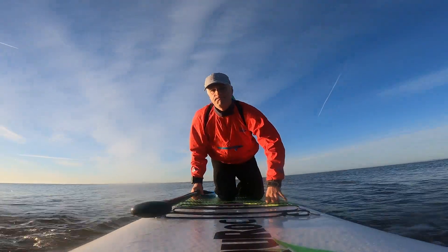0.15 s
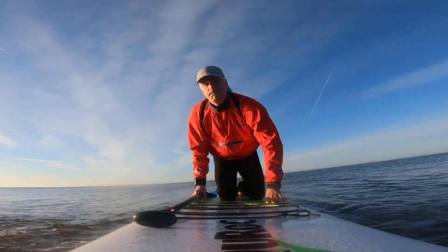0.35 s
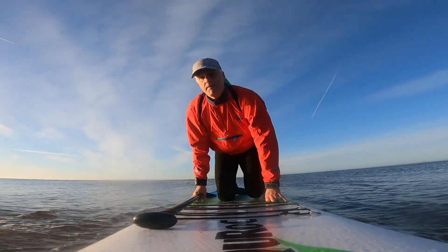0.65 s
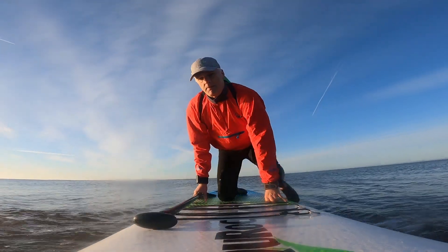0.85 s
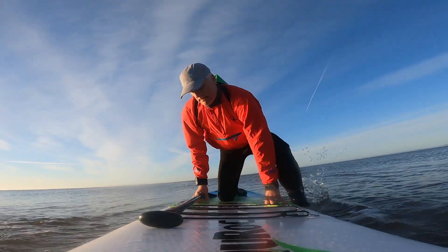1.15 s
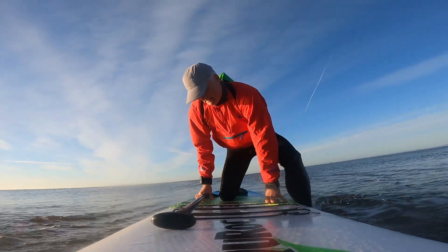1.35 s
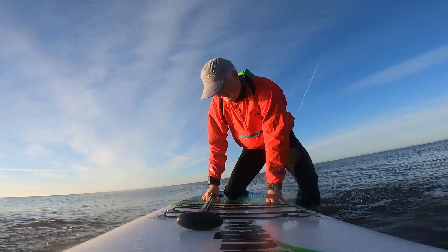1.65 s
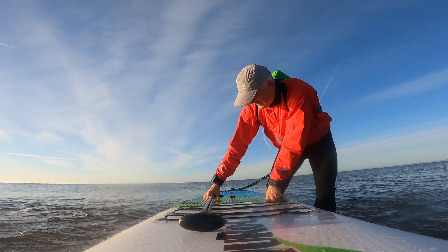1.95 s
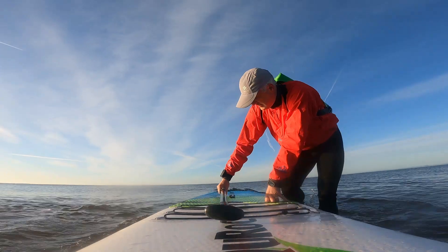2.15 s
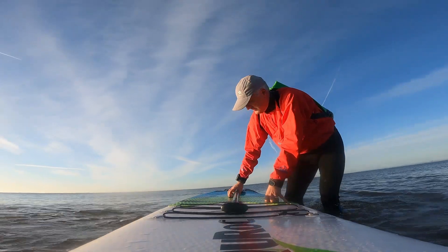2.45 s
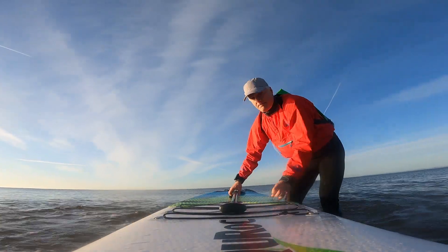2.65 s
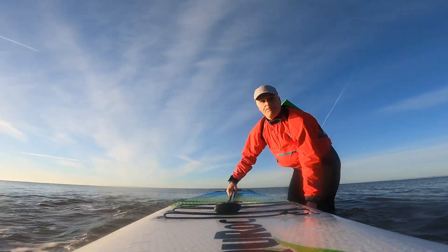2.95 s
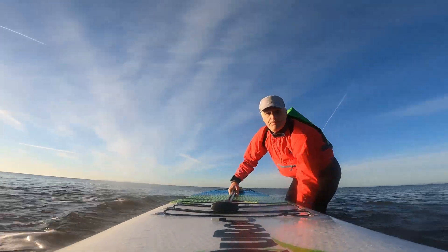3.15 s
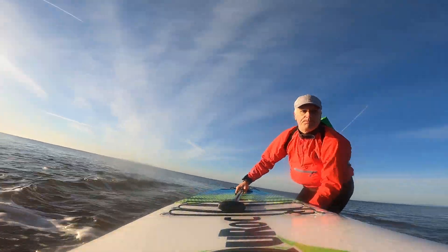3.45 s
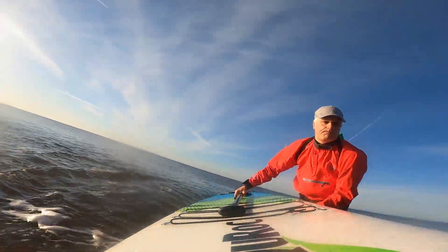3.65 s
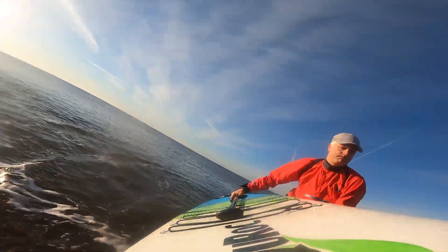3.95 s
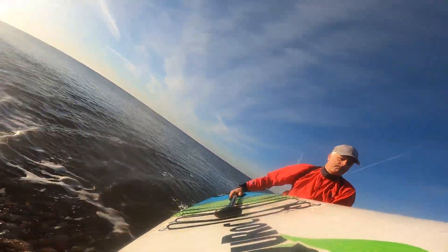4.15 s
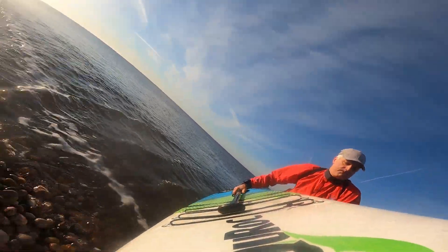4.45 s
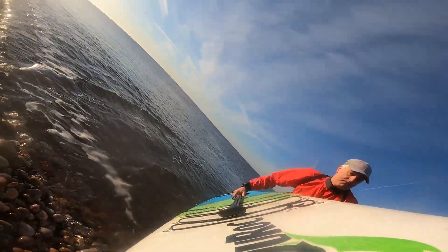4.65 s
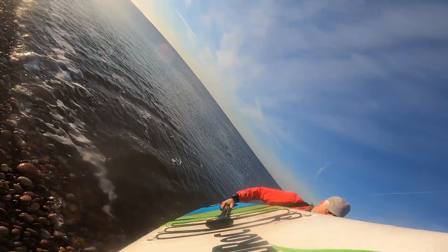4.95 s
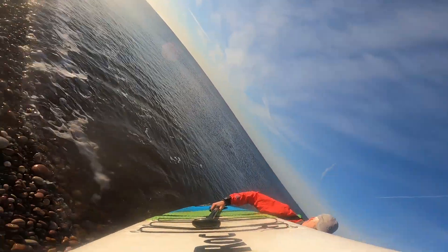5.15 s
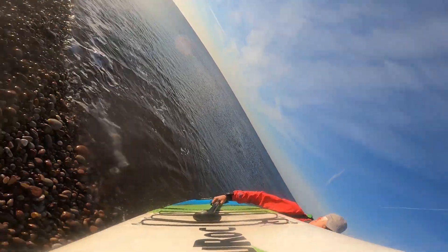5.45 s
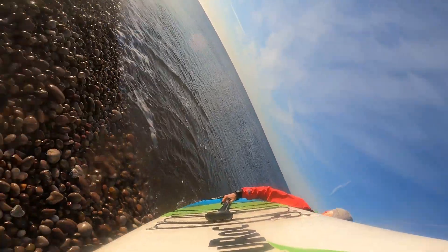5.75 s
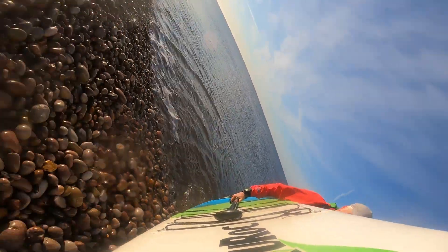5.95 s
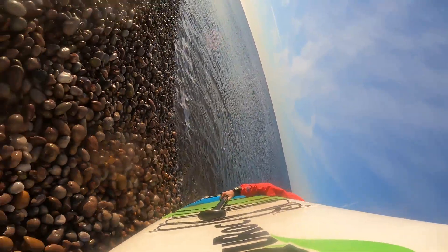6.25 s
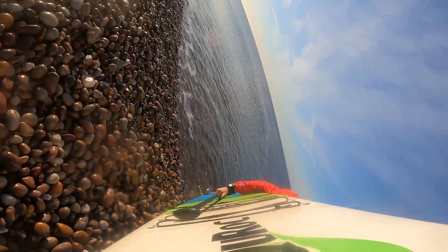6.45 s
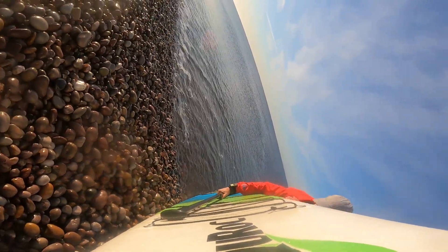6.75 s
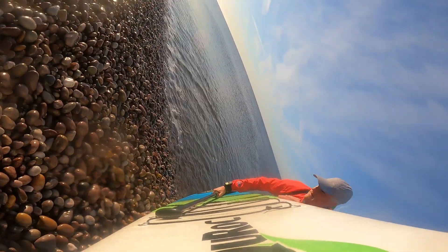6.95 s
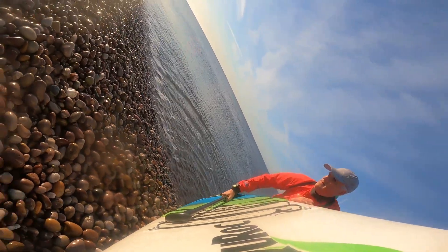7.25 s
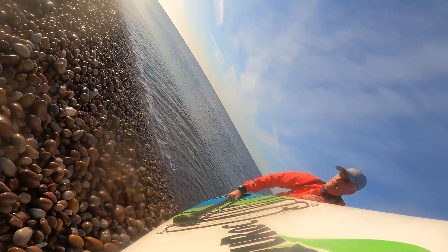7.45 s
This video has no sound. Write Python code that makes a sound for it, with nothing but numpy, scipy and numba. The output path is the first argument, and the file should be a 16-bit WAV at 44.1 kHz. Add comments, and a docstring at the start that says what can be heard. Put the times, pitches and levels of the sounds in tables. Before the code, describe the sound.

Choppy shallow water sloshes against an inflatable paddleboard, sounding close and muffled through the hull and a sealed microphone case. At the start the wash is strong over a low drumming, with a faint, very high hiss of spray, and two dull knocks and a sharp tick land at about 0.5 seconds. From 1 second the water eases and bubbles plop. From 2 seconds the hull rumbles harder in uneven heaves, with more plops and small ticks of drops and stones on the mount. Dull knocks come near 2.7, 3.3 and 3.6 seconds, and the thin hiss stops at about 3.8. Another knock and a surge of sloshing follow at 4.2. The splashing, gurgling and ticking are busiest around 6 seconds, with knocks near 6.3 and 6.8. A faint bright hiss swells at the very end, around 7.5 seconds.

```python
"""A paddleboard in pebble shallows, heard muffled through its inflated hull and a sealed camera case.
At first chop sloshes against the drumming hull, spray hisses thinly and the board takes two knocks.
From about 1 s bubbles plop; from 2 s the hull rumbles harder and drops and stones tick on the mount.
The board is knocked as it is tipped up, and near 3.8 s, as it is lifted, the thin hiss stops.
Chop and knocks go on, busiest around 6 s, and a bright hiss swells at the very end."""
import sys
import numpy as np
from scipy import signal
from scipy.io import wavfile
from scipy.ndimage import uniform_filter1d
from numba import njit

SR = 44100
rng = np.random.default_rng(int(sys.argv[2]) if len(sys.argv) > 2 else 0)


def transcribe(u):
    """Save the signal u as a 16-bit wav file named by the first command-line argument.

    u: samples, shape (n,) or (channels, n), limited to [-1, 1]; the rate is SR.
    q: integer samples, one column per channel.
    """
    v = np.clip(np.atleast_2d(u).T, -1, 1)
    q = np.round(v * 32767).astype(np.int16)
    wavfile.write(sys.argv[1], SR, q)


N = 335601

# steady churn of the water: time_s, rumble_db, slosh_db, wash_db, splash_db, fizz_db
CHURN = [(0, -36, -22.5, -20, -40, -60.5), (.22, -33, -26.5, -18, -58, -69),
         (.42, -33.5, -32.5, -20, -50.5, -80), (.8, -33, -42.5, -31.5, -58.5, -88),
         (1.17, -34, -49.5, -34.5, -68.5, -79), (1.35, -43.5, -47, -33.5, -77, -80.5),
         (1.59, -42.5, -38.5, -31.5, -58.5, -74), (1.9, -42, -47.5, -38.5, -62, -78),
         (2.02, -44, -34.5, -36, -52.5, -76), (2.2, -28, -33, -27.5, -52.5, -75),
         (2.6, -29, -35, -29, -63.5, -76), (2.94, -26.5, -46.5, -37, -58, -79),
         (3.3, -29, -30.5, -36, -53, -75.5), (3.9, -29, -43, -38, -55.5, -72),
         (4.11, -28.5, -32, -33, -47.5, -70.5), (4.62, -28.5, -32, -30, -50, -71),
         (5.07, -29, -32, -26.5, -47.5, -67), (5.64, -24, -31, -33.5, -50, -70),
         (6.04, -30.5, -25, -22.5, -46, -76.5), (6.4, -27.5, -29.5, -36.5, -52, -72),
         (6.87, -27.5, -29, -32.5, -52.5, -69.5), (7.12, -30, -29.5, -30.5, -46, -72.5),
         (7.61, -36, -37.5, -31.5, -47, -64.5)]
# the hull heaving as water sloshes under it: start_s, hold_s, rumble_db, slosh_db
HULL_HEAVES = [(.45, 0.016, -17.5, -24), (.57, .02, -26.5, -43.5), (2.07, .015, -24.5, -30.5),
               (2.17, 0.07, -31, -25), (2.36, .09, -33, -25.5), (2.5, 0.022, -21.5, -31.5),
               (2.65, 0.068, -22, -23.5), (2.78, 0.009, -17, -30), (2.98, 0.082, -24, -42),
               (3.3, 0.12, -36.5, -26), (3.56, 0.041, -35, -22), (4.17, 0.073, -25, -21),
               (4.27, .04, -27, -20.5), (4.33, 0.086, -23.5, -25.5), (4.535, 0.005, -30, -20.5),
               (5.17, 0.0083, -29, -26.5), (5.27, 0.15, -23.5, -26.5), (5.715, 0.013, -28.5, -20),
               (5.79, 0.048, -29, -18), (5.89, .01, -23.5, -24), (5.94, 0.019, -31, -19),
               (6.17, 0.063, -25.5, -21.5), (6.25, 0.025, -23.5, -21), (6.36, .04, -21, -34),
               (6.52, 0.098, -18.5, -22), (6.8, .01, -21, -34), (7.18, 0.19, -24.5, -39.5)]
# chop breaking against the board: start_s, hold_s, wash_db, splash_db, fizz_db
CHOP_BREAKS = [(.43, 0.014, -18.5, -53, -65), (.57, 0.16, -48, -56.5, -85), (2.045, 0.015, -25, -64, -75.5),
               (2.17, 0.042, -24.5, -52, -79), (2.365, 0.024, -21, -59, -73),
               (2.46, 0.04, -23.5, -59, -71.5), (2.63, 0.034, -25, -61, -71),
               (2.78, .01, -24.5, -53.5, -78), (3.472, 0.019, -33.5, -40, -81),
               (3.555, 0.05, -31, -40.5, -78), (4.128, .005, -19.5, -44, -72),
               (4.19, .005, -20, -39.5, -71), (4.25, 0.15, -25.5, -49.5, -73.5),
               (4.53, 0.015, -29, -45.5, -70), (5.692, 0.0078, -26.5, -38.5, -72.5),
               (5.787, .005, -27, -39.5, -71.5), (5.885, 0.031, -20, -37, -67), (6.0, .19, -21, -54.5, -73),
               (6.234, 0.018, -17.5, -34, -57), (6.37, 0.0088, -38, -49, -64),
               (6.494, 0.05, -18.5, -34, -59.5), (6.57, 0.16, -22, -38, -66.5),
               (7.19, 0.056, -31, -43.5, -74)]
# deep notes of the hull: pitch_hz, width_hz, level_db
HULL_NOTES = [(26.7, 13, -2), (51.5, 11, 0), (68.2, 13, 0.5)]
# notes of the sloshing water: pitch_hz, width_hz, level_db
SLOSH_NOTES = [(110, 63, 1), (157.4, 60, 0.5), (214.7, 33, -7)]
# how much the large bubbles stand out in the wash: time_s, boost_db
LARGE_BUBBLE_BOOST = [(0, 3.5), (.5, -0.5), (.9, -1), (1.4, 1), (1.9, -2), (2.6, -0.5), (3.2, -0.5),
                      (3.7, -1.5), (4.2, -0.5), (4.7, 1), (5.4, 0.5), (5.8, 1), (6.1, -5.5), (6.6, -3.5),
                      (7, -11), (7.61, -3.5)]
# single bubbles and their slaps of water: start_s, level_db, pitch_hz, slap_db
BUBBLE_PLOPS = [(0.983, -21.5, 980, -69), (1.011, -20.5, 934, -58), (1.196, -23, 985, -60),
                (1.268, -13, 918, -55), (1.298, -30.5, 247, -65), (1.308, -16.5, 906, -54),
                (1.334, -18.5, 950, -59), (1.354, -22.5, 1000, -61), (1.393, -24.5, 1030, -65),
                (1.442, -11, 773, -57), (1.476, -26.5, 236, -60), (1.494, -28, 966, -50),
                (1.556, -25, 450, -60), (1.558, -17, 886, -40), (1.642, -20.5, 533, -62),
                (2.046, -22, 400, -55), (2.055, -14.5, 880, -41.5), (2.152, -14, 935, -35),
                (2.181, -15, 520, -43), (2.19, -10, 1020, -43), (2.238, -18, 614, -38),
                (2.284, -14, 750, -49), (2.299, -18, 940, -48), (2.341, -18.5, 597, -54),
                (2.375, -13.5, 644, -34), (2.422, -22.5, 496, -31), (2.46, -16, 880, -38),
                (2.489, -17.5, 540, -48), (2.534, -16.5, 960, -48), (2.569, -11.5, 877, -37),
                (2.631, -17.5, 770, -41.5), (2.654, -13, 704, -45), (2.766, -20.5, 374, -43),
                (3.305, -26, 448, -44), (3.47, -29.5, 740, -44), (3.553, -20.5, 505, -30),
                (3.683, -26.5, 1170, -50), (4.193, -13, 680, -34), (4.526, -17, 625, -50),
                (5.691, -16.5, 1150, -27.5), (5.768, -35, 805, -48), (5.787, -12.5, 607, -29),
                (6.153, -14, 386, -47), (6.193, -16.5, 1100, -45), (6.233, -15, 940, -26.5),
                (6.249, -16, 453, -28), (6.425, -20, 910, -43), (6.5, -18, 1000, -34),
                (6.786, -22, 410, -35)]
# knocks on the board: start_s, level_db, first_pitch_hz, last_pitch_hz, decay_s
BOARD_KNOCKS = [(0.446, -15, 210, 60.3, 0.033), (0.501, -5, 128, 61, 0.012), (2.662, -12.5, 121, 70, 0.021),
                (2.701, -8.5, 217, 91.7, 0.037), (3.304, -11, 187, 90, 0.018),
                (3.559, -12.5, 262, 127, .02), (4.205, -13.5, 401, 171, .035),
                (6.256, -8, 228, 92.3, 0.031), (6.791, -4, 237, 90, 0.01)]
# drops and stones hitting the camera mount: start_s, level_db, brightness_db
MOUNT_TICKS = [(0.43, -39, -11), (0.4546, -22.5, -4), (1.442, -60, 1), (1.5195, -48.5, -4),
               (2.0453, -41, -12), (2.185, -41, -10), (2.238, -42, -8), (2.3, -43, -9), (2.3785, -41, -12),
               (2.422, -43, -11), (2.434, -38, -13), (2.442, -35, -8), (2.4613, -42, -5), (2.5683, -41, -8),
               (2.632, -48, -6), (2.646, -38, -9.5), (2.7886, -44.5, -9), (3.186, -44.5, -10.5),
               (3.4723, -33, -18), (3.555, -28.5, -0.5), (3.577, -32, -20), (3.6355, -37, -12),
               (3.685, -46, -10), (4.1322, -35, -16), (4.191, -32, -19), (5.689, -36.5, -17.5),
               (5.787, -30, -21), (5.809, -33, -14), (6.0066, -36, -11), (6.2264, -38, -6),
               (6.237, -28, -2), (6.248, -24, -12), (6.329, -44, -2), (6.368, -49, -1), (6.4924, -35, -14),
               (6.516, -27, -6)]
# notes the mount rings with: pitch_hz, level_db, ring_s (time to fade by 60 dB)
MOUNT_NOTES = [(2280, 5, 0.042), (2980, 2, 0.015), (3490, -13, 0.06)]
# bright parts of a tick: pitch_hz, level_db, decay_cycles, db_per_brightness_db
BRIGHT_NOTES = [(3030, -1, 3.5, 2.5), (3500, -6.5, 3.5, 1.5), (5200, -23.5, 3, 0.7)]
# thin hiss of spray: time_s, level_db
SPRAY_HISS = [(0, -58), (.14, -60), (.42, -65.5), (.51, -70), (.86, -81), (1.07, -79), (1.13, -67),
              (1.21, -77.5), (1.52, -71), (1.56, -75), (1.62, -68), (1.74, -75.5), (2.35, -71.5),
              (2.52, -76.5), (3.63, -75.5), (3.7, -80), (3.78, -115)]
# short spits of spray: start_s, level_db
SPRAY_SPITS = [(0.1188, -55), (0.2181, -52), (0.3862, -60), (0.4276, -46), (0.5847, -66), (1.355, -59),
               (1.4682, -59), (1.5016, -58), (1.5211, -54), (2.0085, -64), (2.0554, -63), (2.1192, -63),
               (2.3133, -63), (2.3612, -56)]
# bright hiss at the end: time_s, level_db
END_HISS = [(7.3, -100), (7.42, -81), (7.61, -63)]


def water():
    """Chop shakes the hull and traps air: a low rumble, gurgling bubbles and a fine fizz on top."""
    heaves = surges(HULL_HEAVES, rise_db_s=301.5, fall_db_s=151)
    breaks = surges(CHOP_BREAKS, rise_db_s=900.5, fall_db_s=300.5)
    rumble, slosh, wash, splash, fizz = np.hypot(gains(CHURN), heaves + breaks)
    foam_db = wander(35)  # bursts of foam move wash, splash and fizz together
    low = rumble * drumming(HULL_NOTES, flicker_db=1.6, rate_hz=12)
    low += slosh * drumming(SLOSH_NOTES, flicker_db=1.1, rate_hz=13)
    mid = wash * undb(0.94 * foam_db) * gurgle()
    patter = swarm(1402, 4200, -15, 1.9, 3.0, count=16000)
    mid += splash * undb(0.27 * foam_db) * patter
    high = fizz * undb(foam_db) * unit(muffle(noise(2300, 4440), 6500))
    droplets = muffle(swarm(2800, 5500, -1.5, 1.0, 3.8, count=3000), 6000)
    high += 0.83 * breaks[2] * droplets  # droplets burst with the fizz of a break
    gulps = swarm(200, 450, 0.5, 3.54, 4.3, count=900)
    low += undb(-8) * heaves[1] * gulps  # hollow gulps come with the slosh of a heave
    return muffle(low, 900) + muffle(mid, 2900) + high


def drumming(notes, flicker_db, rate_hz):
    """Swirling water shakes broad, low notes, each flickering on its own."""
    return unit(sum(undb(db + flicker_db * wander(rate_hz)) * unit(noise(hz - width / 2, hz + width / 2, 1))
                    for hz, width, db in notes))


def gurgle():
    """Crowds of bubbles ring in rushing water: large ones low, small ones higher."""
    large = swarm(263, 622, 3.6, 1.807, 3.2, count=3000) + unit(noise(270, 650))
    small = swarm(611, 1527, -2.0, 2.4, 5.4, count=7000) + 1.52 * unit(noise(600, 1227))
    return 0.5 * gains(LARGE_BUBBLE_BOOST)[0] * unit(large) + 0.58 * unit(muffle(small, 1796))


def plops():
    """A slap of water throws up one bubble, then five quieter ones of nearly its size."""
    start_s, db, hz, slap_db = np.transpose(BUBBLE_PLOPS)
    cycles = 2.19 - .04 * (db + 18.5)  # harder plops are shorter
    sound = ping(start_s, hz, cycles, undb(db), glide=0.083)
    for late, detune in rng.random((len(start_s), 5, 2)).transpose(1, 2, 0):
        after_s = start_s + 0.0036 + 0.041 * late
        sound += ping(after_s, hz * (.85 + 0.32 * detune), cycles, undb(db - 8.5 - 17 * late), glide=0.16)
    spatter = swarm(500, 4000, -6, 1.4, 3, count=24000)
    spatter /= np.std(band(spatter, 1700, 3500))
    slaps = bursts(start_s, slap_db, decay_s=0.0059) * spatter
    return muffle(sound, 2100) + muffle(slaps, 2400)


def knocks():
    """A knock sends bending waves along the board: the high part arrives first, the low part late."""
    start_s, db, first_hz, last_hz, decay_s = np.transpose(BOARD_KNOCKS)
    return muffle(tones(start_s, first_hz, last_hz, 0.004, decay_s, undb(db)), 840)


def ticks():
    """Drops and stones hit the mount: a click with a dull and a bright part, then the mount rings."""
    start_s, db, bright_db = np.transpose(MOUNT_TICKS)
    sound = ping(start_s, hz=2250, cycles=1.7, size=undb(db), glide=0.014)
    for note_hz, note_db, ring_s in MOUNT_NOTES:
        hz = note_hz * (1 + 0.0063 * rng.standard_normal(len(start_s)))
        sound += tones(start_s, hz, hz, 8 / SR, ring_s / np.log(1000), undb(db + note_db - 16))
    bright = sum(ping(start_s, hz, cycles, undb(db + slope * bright_db + part_db), glide=0.014)
                 for hz, part_db, cycles, slope in BRIGHT_NOTES)
    return muffle(sound, 7200) + muffle(bright, 7000)


def squeak():
    """A faint, fluttering whistle swells and fades around one knock."""
    whistle = tones([3.525], first_hz=3500, last_hz=3500, rise_s=0.04, decay_s=0.02, size=undb(-34))
    return undb(4.4 * wander(90)) * whistle


def hiss():
    """Fine spray makes a thin, very high hiss with spits in it; separately, a broader hiss swells at the end."""
    grains = rng.standard_normal(N) * undb(1.5 * wander(60))
    thin = unit(band(band(grains, 11520, 14200, order=4), 11800, 15000, order=1))
    thin += .2 * unit(band(grains, 13500, 16000, order=4))
    spits = bursts(*np.transpose(SPRAY_SPITS), decay_s=.003)
    return (gains(SPRAY_HISS)[0] + spits) * thin + gains(END_HISS)[0] * unit(noise(3000, 7000))


def swarm(lo_hz, hi_hz, tilt_db, cycles, scatter_db, count):
    """Bubbles ring at random moments, many quiet and few loud; tilt_db is added per octave up."""
    when, pitch, chance, length = rng.random((count, 4)).T
    octaves = pitch * np.log2(hi_hz / lo_hz)
    rarity = np.minimum(-np.log(1 - chance), 4)
    size = undb(tilt_db * octaves + scatter_db * rarity)
    return unit(ping(when * N / SR, lo_hz * 2 ** octaves, cycles * (.5 + length), size, glide=0.091))


def ping(time_s, hz, cycles, size, glide):
    """A few cycles of ringing that rise in pitch, as an air pocket does near the surface."""
    decay_s = np.maximum(cycles, .3) / hz
    crest = .2 ** .5 * .8 ** 2  # highest point of the swell and fade
    return tones(time_s - decay_s / 2, hz, hz * (1 + glide), decay_s / 2, decay_s, size / crest)


def tones(start_s, first_hz, last_hz, rise_s, decay_s, size):
    """Tones that swell, slide in pitch and fade; a single number applies to all of them."""
    columns = np.broadcast_arrays(start_s, first_hz, last_hz, rise_s, decay_s, size)
    return add_tones(np.column_stack(columns))


@njit
def add_tones(rows):
    """Add up the tones sample by sample, each until it has almost died away."""
    out = np.zeros(N)
    for row in rows:
        start_s, first_hz, last_hz, rise_s, decay_s, size = row
        fade, grow = np.exp(-1 / (decay_s * SR)), np.exp(-1 / (rise_s * SR))
        i, phase, tail, onset = int(start_s * SR), 0., 1., 1.
        while i < N and tail > .004:
            if i >= 0:
                out[i] += size * tail * (1 - onset) ** 2 * np.sin(2 * np.pi * phase)
            phase += (last_hz + (first_hz - last_hz) * tail) / SR
            tail, onset, i = tail * fade, onset * grow, i + 1
    return out


def surges(table, rise_db_s, fall_db_s):
    """One gain curve per level column: each row swells, holds and dies away, adding in power."""
    start_s, hold_s, *levels_db = np.transpose(table)
    grid = np.arange(0, N, 32)
    age_s = grid / SR - start_s[:, None]
    shape_db = np.minimum(rise_db_s * age_s, 0) - fall_db_s * np.maximum(age_s - hold_s[:, None], 0)
    power = undb(2 * np.array(levels_db)) @ undb(2 * shape_db)
    return [np.interp(np.arange(N), grid, np.sqrt(p)) for p in power]


def bursts(start_s, db, decay_s):
    """A gain curve that jumps at each start and dies away."""
    kicks = np.zeros(N)
    np.add.at(kicks, (start_s * SR).astype(int), undb(db))
    return uniform_filter1d(signal.lfilter([1], [1, -np.exp(-1 / (decay_s * SR))], kicks), size=110)


def wander(rate_hz):
    """A smooth random curve that heads for a new value rate_hz times a second."""
    hold = int(SR / rate_hz)
    steps = np.repeat(rng.standard_normal(N // hold + 1), hold)
    return unit(uniform_filter1d(uniform_filter1d(steps, hold), hold)[:N])


def gains(table):
    """Join the levels of a table into one gain curve per column."""
    time_s, *levels_db = np.transpose(table)
    return [undb(np.interp(np.arange(N) / SR, time_s, db)) for db in levels_db]


def muffle(x, hz):
    """The sealed case takes away the treble above hz."""
    return signal.sosfilt(signal.butter(3, hz, fs=SR, output="sos"), x)


def noise(lo_hz, hi_hz, order=2):
    """Random noise between two pitches."""
    return band(rng.standard_normal(N), lo_hz, hi_hz, order)


def band(x, lo_hz, hi_hz, order=2):
    """Keep the sound between two pitches."""
    return signal.sosfilt(signal.butter(order, [lo_hz, hi_hz], "band", fs=SR, output="sos"), x)


def undb(db):
    """Turn decibels into a gain to multiply by."""
    return 10 ** (np.asarray(db) / 20)


def unit(x):
    """Scale to an average strength (rms) of 1."""
    return x / np.sqrt(np.mean(x ** 2))


def scene():
    """All sources and the faint hiss of the microphone, in one channel."""
    sound = water() + plops() + ticks() + squeak() + knocks() + hiss()
    return (sound + undb(-91.5) * rng.standard_normal(N))[None]


def record(dry):
    """The recorder cuts the treble above 15600 Hz."""
    return signal.sosfilt(signal.ellip(8, .2, 40, 15600, fs=SR, output="sos"), dry)


dry = scene()
out = record(dry)
transcribe(out)
```